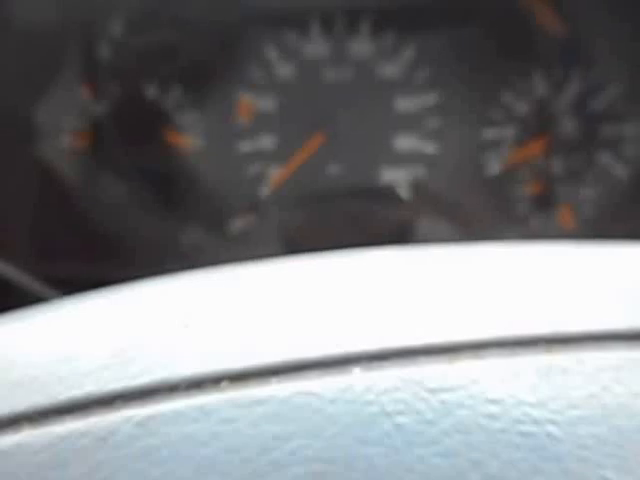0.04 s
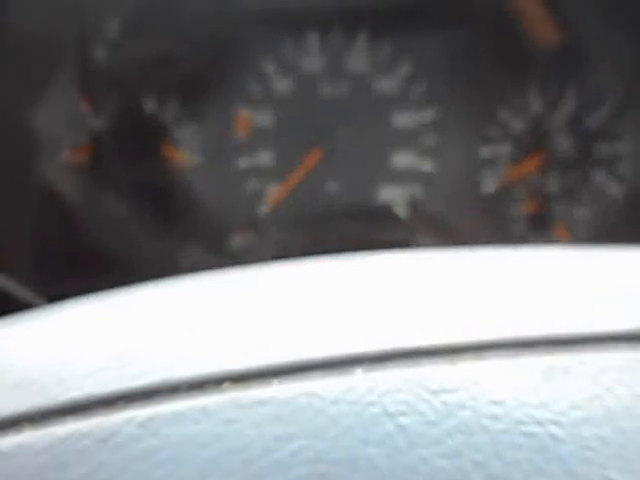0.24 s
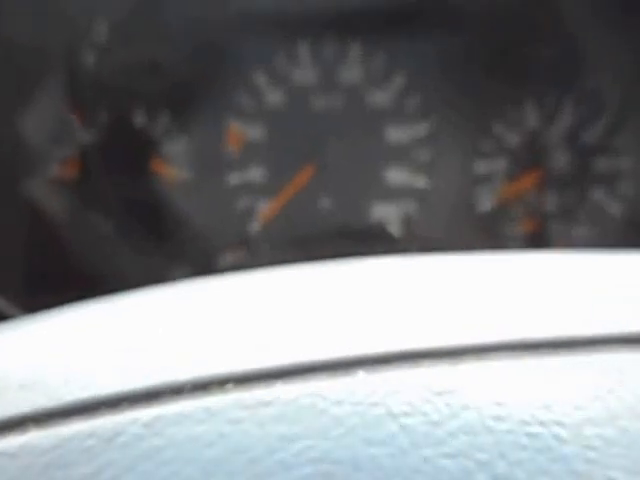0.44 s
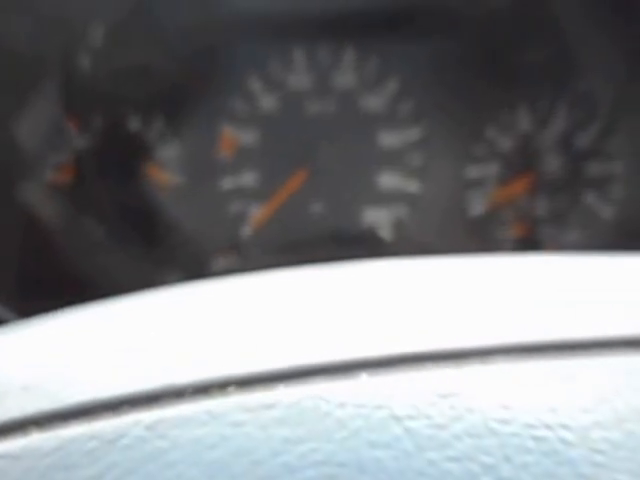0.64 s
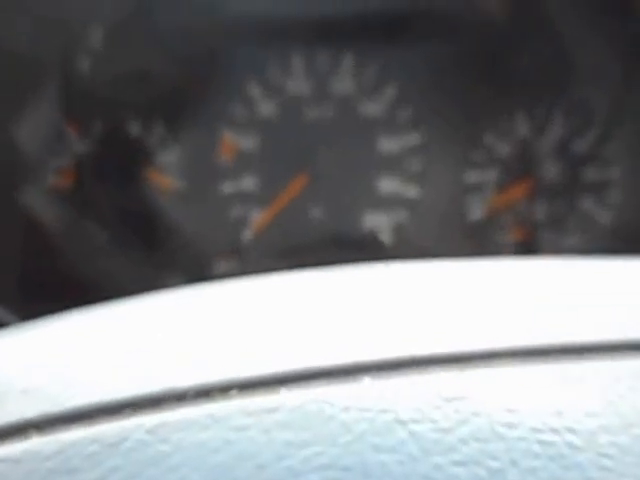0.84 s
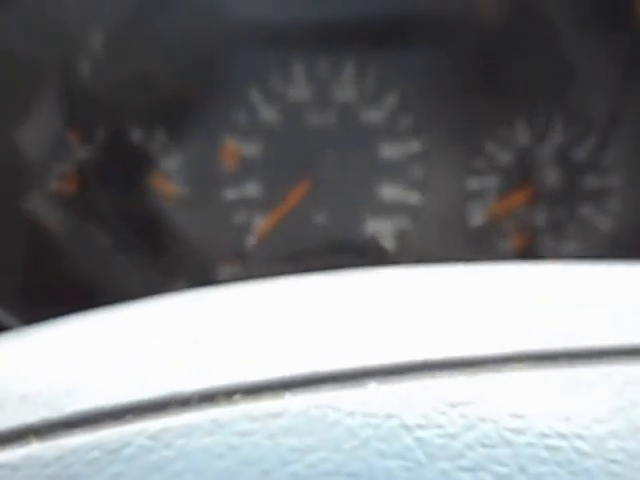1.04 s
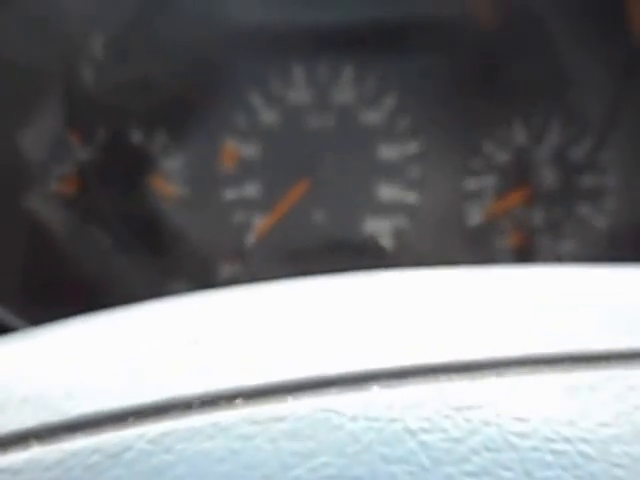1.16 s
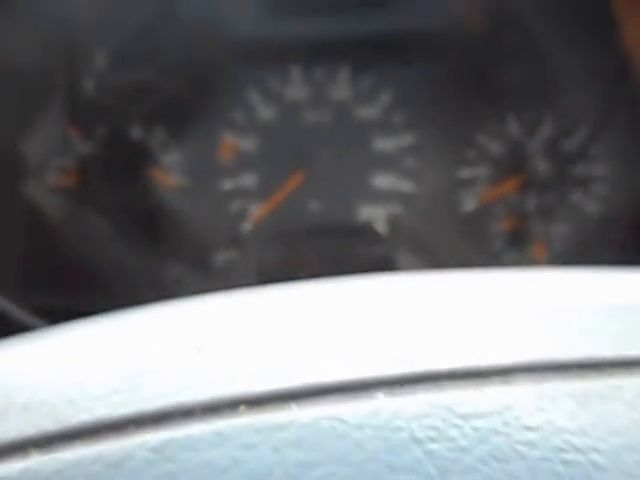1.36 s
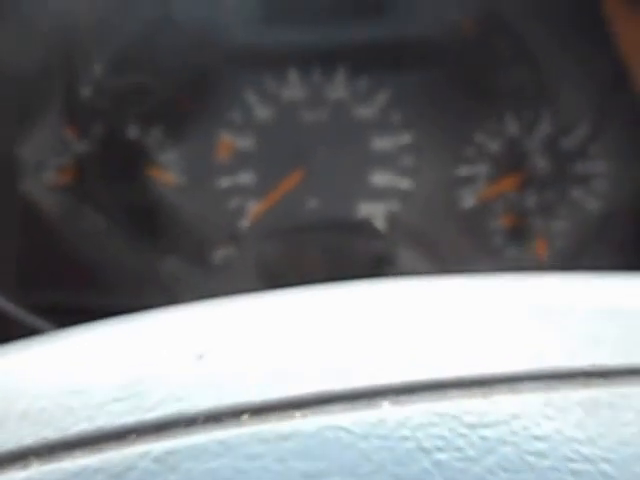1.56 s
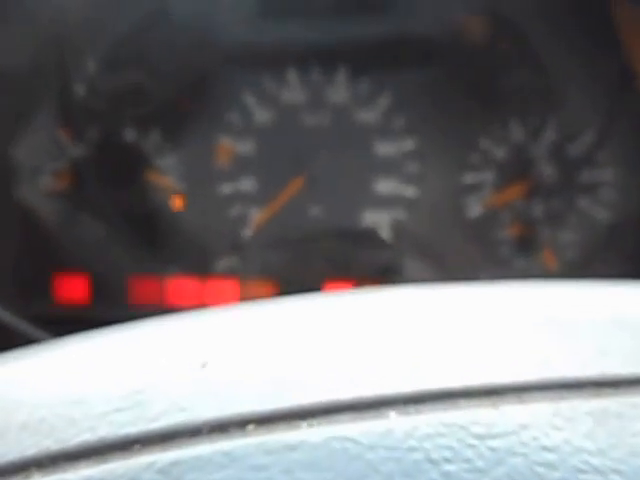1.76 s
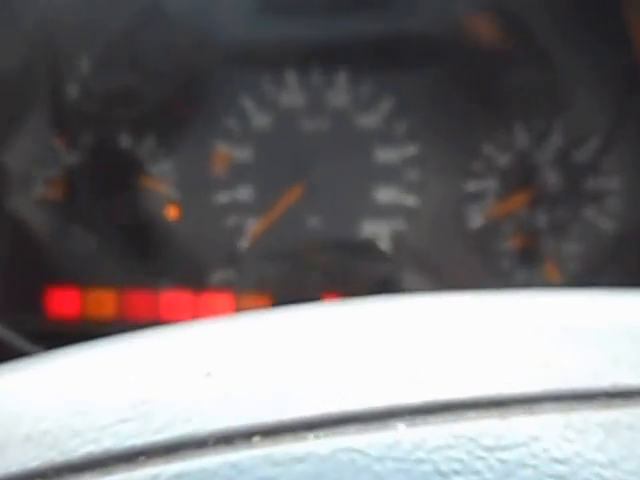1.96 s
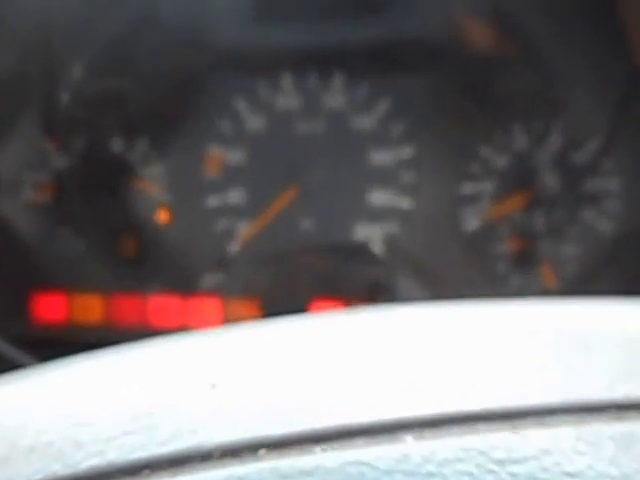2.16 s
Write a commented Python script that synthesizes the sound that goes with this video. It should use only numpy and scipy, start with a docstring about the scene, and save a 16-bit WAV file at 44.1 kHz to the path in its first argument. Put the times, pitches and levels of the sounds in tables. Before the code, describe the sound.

An ignition key turns in a parked car's lock, heard close in a dry cabin. After a tiny tick, two bright metallic snaps land at about 0.33 and 0.41 seconds with a dull column knock. Barely audible key ticks follow. At 1.65 a tight cluster makes a fuller metal-and-plastic clack, with small rattles until 1.73. Underneath, faint road hiss swells until about 1.6, with low rumble and a very thin tyre whine.

```python
"""A key turns in the ignition lock of a parked car: detents snap and ring the metal barrel (resonant modes plus
a dry crack) and the plastic column housing (modes); the column knocks and the key ticks on metal.
A short diffuse cabin tail follows. Outside a vehicle passes: banded road-noise hiss swells over steady rumble,
with a thin tyre whine made of harmonic sines."""
import sys
import numpy as np
from scipy import signal
from scipy.fft import rfft, irfft
from scipy.io import wavfile
from scipy.ndimage import uniform_filter1d

SR = 44100
rng = np.random.default_rng(int(sys.argv[2]) if len(sys.argv) > 2 else 0)


def linear_from_db(decibels):
    """Turn decibels (scalar or array-like) into linear amplitude factors; 0 gives 1."""
    return 10 ** (np.asarray(decibels, float) / 20)


def waveform_to_disk(signal):
    """Save audio, clipped to [-1, 1], as 16-bit WAV at the path in sys.argv[1]."""
    frames = np.transpose(np.atleast_2d(signal))
    scaled = np.clip(frames, -1, 1) * 32767
    samples = np.round(scaled).astype(np.int16)
    wavfile.write(sys.argv[1], SR, samples)


N = 97681

# detent snaps: t/s, metal level/dB, housing level/dB, metal colour centre f/Hz, rattle decay/ms
SNAPS = [(0.317, -33.5, -44, 5500, 8.2), (0.3257, -13, -24.5, 4860, 11.9),
         (0.4081, -13.5, -31.5, 6000, 9.4), (1.6506, -22, -29.5, 5500, 7.5),
         (1.6520, -14.5, -23, 5000, 5.3), (1.6570, -18, -15.5, 3700, 7.5), (1.672, -33.5, -31.5, 3500, 7.7)]


def rattle(when_s, decay_ms):
    """A scrape grows into a burst of tiny uneven impacts that dies away; energy is that of the envelope."""
    rise_ms, hold = 0.9, 1.14  # hold above 1: stays up before it falls
    scrape_db, scrape_ms = -13, 2.04
    grain_db = 2.7  # scales the unevenness of the impacts
    t_ms = (np.arange(N) / SR - when_s) * 1000
    after_ms = np.maximum(t_ms, 0)
    env = (1 - np.exp(-after_ms / rise_ms)) * np.exp(-(after_ms / decay_ms) ** hold)
    env = env + linear_from_db(scrape_db) * np.exp(-np.abs(t_ms) / scrape_ms)
    grain = linear_from_db(grain_db * np.minimum(rng.exponential(size=N), 3))
    burst = env * rng.standard_normal(N) * grain
    return burst * np.sqrt(np.sum(env ** 2) / np.sum(burst ** 2))


def blow(when_s, decay_ms):
    """One firm single-sample impact added to the rattle."""
    impact_db = 7  # energy re the rattle
    x = rattle(when_s, decay_ms)
    impact = (np.arange(N) == int(when_s * SR)) * np.sqrt(np.sum(x ** 2))
    return x + linear_from_db(impact_db) * impact


def colour(x, centre_hz, q):
    """One broad resonance, unity gain at its centre."""
    return signal.lfilter(*signal.iirpeak(centre_hz, q, SR), x)


def ring(x, modes):
    """Excite decaying sine modes; their summed impulse response has energy 1."""
    t = np.arange(4096) / SR
    h = sum(linear_from_db(db - 60 * t / t60_s) * np.sin(2 * np.pi * hz * t) for hz, db, t60_s in modes)
    return signal.fftconvolve(x, h / np.sqrt(np.sum(h ** 2)))[:N]


def barrel():
    """Snap rattles ring the metal barrel; the same rattles, equalised, sound as a dry crack."""
    # barrel modes: f/Hz, relative level/dB, t60/s
    barrel_modes = [(2810, -4, .03), (2955, -7, .05), (3345, -2, .035), (3810, -6, .04), (4100, -4, .03),
                    (4670, -3, .03), (5150, 0, .03), (5740, -5, .03), (6070, -3, .03), (6390, -3, .035),
                    (6700, -3, .03), (7270, -7, .03), (7410, -6, .03), (7700, -6, .03), (8050, -7, .03)]
    # crack equaliser: f/Hz, relative gain/dB
    crack_eq = [(300, -52.5), (1200, -7), (2500, 3.5), (4000, 2), (5500, 4), (7000, 4.5), (9000, 5),
                (11000, -3)]
    crack_db = 8.5
    hard = sum(linear_from_db(db) * colour(rattle(s, ms), hz, 1.135) for s, db, _, hz, ms in SNAPS)
    crack_gain = linear_from_db(crack_db + at(crack_eq, np.fft.rfftfreq(N, 1 / SR)))
    crack = irfft(rfft(hard) * crack_gain, N)
    return ring(hard, barrel_modes) + crack


def housing():
    """Snap blows ring the plastic housing."""
    # housing modes: f/Hz, relative level/dB, t60/s
    housing_modes = [(1110, -11, .04), (1330, -13, .04), (1490, -7, .04), (1568, 1, .045), (1720, -9, .04),
                     (1950, -13, .035), (2235, -1, .045), (2945, -9, .04)]
    soft = sum(linear_from_db(db) * blow(s, ms) for s, _, db, _, ms in SNAPS)
    return ring(soft, housing_modes)


def column():
    """Dull coloured blows ring the steering column."""
    # column knocks: t/s, level/dB, colour centre f/Hz, rattle decay/ms
    knocks = [(.3300, -25, 660, 3.4), (0.4096, -27, 448, 4.7), (1.6552, -26, 605, 10.6)]
    # column modes: f/Hz, relative level/dB, t60/s
    column_modes = [(320, -14, .04), (470, -4, .06), (590, -1, .05), (685, -4, .07), (770, -8, .05),
                    (980, -9, .04)]
    dull = sum(linear_from_db(db) * colour(blow(s, ms), hz, 2.3) for s, db, hz, ms in knocks)
    return ring(dull, column_modes)


def lock():
    """Barrel, housing and column sound together, low end cut."""
    low_cut_hz = 324
    high_pass = signal.butter(3, low_cut_hz, "high", fs=SR, output="sos")
    return signal.sosfilt(high_pass, barrel() + housing() + column())


def ticks():
    """Light touches of key on metal: short rattles in one broad resonance."""
    # key ticks: t/s, level/dB, colour centre f/Hz, rattle decay/ms
    touches = [(0.056, -45.5, 8800, 12), (0.284, -23.5, 3160, 3.1), (.389, -14.5, 3270, 1.3),
               (0.596, -39, 7440, 2.8), (1.285, -58, 7900, 3.6), (1.336, -42, 7800, 4.8),
               (1.609, -29, 4800, 2.7), (1.698, -24, 3620, 14), (1.728, -31, 3770, 17)]
    return sum(linear_from_db(db) * colour(rattle(s, ms), hz, 4.5) for s, db, hz, ms in touches)


def cabin(x):
    """Add a diffuse noise tail whose decay time depends on frequency, shortest near 1 kHz."""
    # cabin decay: f/Hz, t60/s
    cabin_decay = [(300, 0.16), (1000, 0.031), (2500, 0.21), (5000, 0.16), (9000, 0.21)]
    tail_db, onset_s = -18, 0.012
    t = np.arange(16384) / SR
    onset = np.minimum(t / onset_s, 1)
    h = bands(len(t), 140, lambda hz: linear_from_db(-60 * t / at(cabin_decay, hz)) * onset)
    return x + linear_from_db(tail_db) * signal.fftconvolve(x, h / np.sqrt(np.sum(h ** 2)))[:N]


def road_hiss():
    """Noise bands drift singly while the whole swells and brightens as the vehicle passes."""
    # vehicle pass: t/s, level/dB, brightness/(dB per octave)
    vehicle_pass = [(0, -43.5, -0.5), (.3, -42.5, 0), (0.599, -41.5, -0.8), (.85, -41.5, -0.36),
                    (1.101, -40, 0), (1.301, -40, 0.66), (1.549, -39, 0.02), (1.801, -39.5, -0.38),
                    (2., -41.5, 0.27), (2.21, -41.5, 0.14)]
    # road spectrum: f/Hz, relative density/(dB per Hz)
    road_spectrum = [(180, -43.5), (300, -48), (387, -5), (561, -8), (878, 1.5), (1310, -4.5), (1520, -7),
                     (1850, -3.5), (2390, -11), (3260, -12.5), (5840, -22.5), (9130, -29.5), (10600, -47.5),
                     (13800, -64), (22000, -120)]
    flicker_db, flicker_rate_hz = -0.91, 18
    pivot_hz, tread_hz, tread_gain = 900, 2000, 3.7  # the tread band follows brightness most
    t = np.arange(N) / SR
    s, db, tilt = np.array(vehicle_pass).T
    level_db, tilt = np.interp(t, s, db), np.interp(t, s, tilt)

    def band_gain(hz):
        tread = tread_gain * np.exp(-(3 * np.log2(hz / tread_hz)) ** 2)
        bright_db = tilt * (np.log2(hz / pivot_hz) + tread)
        return linear_from_db(at(road_spectrum, hz) + flicker_db * walk(flicker_rate_hz) + bright_db)

    return linear_from_db(level_db) * unit(bands(N, 236.4, band_gain))


def tyre_whine():
    """Harmonic sines on a gliding pitch, each fading up and down singly."""
    # whine: t/s, pitch f/Hz, level/dB
    whine_track = [(.55, 639.5, -70), (.72, 638.8, -50), (.95, 637, -51), (1.15, 636.7, -48),
                   (1.32, 636.5, -54), (1.46, 636.2, -44), (1.78, 635.3, -43), (1.92, 635, -58),
                   (2.2, 635, -66)]
    # whine orders: multiple of pitch, relative level/dB
    whine_orders = [(1, -12), (2, 0), (3, -6), (4, -9), (5, -11), (6, -15), (7, -16), (8, -22), (9, -21)]
    fade_db, fade_rate_hz = 2.2, 5.14
    t = np.arange(N) / SR
    s, hz, db = np.array(whine_track).T
    phase = 2 * np.pi * np.cumsum(np.interp(t, s, hz)) / SR
    whine = 0
    for k, order_db in whine_orders:
        sine = np.sin(k * phase + 2 * np.pi * rng.random())
        whine = whine + linear_from_db(order_db + fade_db * walk(fade_rate_hz)) * sine
    return linear_from_db(np.interp(t, s, db)) * whine


def rumble():
    """Steady low-frequency noise in bands below 420 Hz."""
    # rumble spectrum: f/Hz, relative density/(dB per Hz)
    rumble_spectrum = [(12, -46), (20, -26), (48, -2.5), (76, -14.5), (113, -0.5), (150, -13), (353, -2.5),
                       (400, -12.5), (520, -46), (880, -120)]
    rumble_db = -58
    noise = bands(N, 20, lambda hz: linear_from_db(at(rumble_spectrum, hz)) * (hz < 420))
    return linear_from_db(rumble_db) * unit(noise)


def unit(x):
    """Scale to rms 1."""
    return x / np.sqrt(np.mean(x ** 2))


def at(table, hz):
    """Read (f/Hz, value) points on a log-frequency axis."""
    table = np.array(table, float)
    return np.interp(np.log(np.maximum(hz, 1)), np.log(table[:, 0]), table[:, 1])


def walk(rate_hz):
    """Slow random drift, rms 1: twice-smoothed random steps at rate_hz."""
    k = int(SR / rate_hz)
    steps = np.repeat(rng.standard_normal(N // k + 1), k)
    return unit(uniform_filter1d(uniform_filter1d(steps, k), k)[:N])


def bands(n, lo_hz, gain):
    """Noise in overlapping third-octave bands, each multiplied by gain(centre Hz)."""
    f, out = np.fft.rfftfreq(n, 1 / SR), 0
    spec = rfft(rng.standard_normal(n))
    for hz in lo_hz * 2 ** (np.arange(33) / 3):
        if hz < SR / 2:
            share = np.clip(1 - 3 * np.abs(np.log2(np.maximum(f, 1) / hz)), 0, 1)
            out = out + irfft(spec * share, n) * gain(hz)
    return out


def scene():
    """Lock and ticks in the cabin over the traffic."""
    traffic = road_hiss() + tyre_whine() + rumble()
    return (cabin(lock() + ticks()) + traffic)[None]


def roll_off(x):
    """The treble ends steeply here."""
    return signal.sosfilt(signal.butter(12, 10750, fs=SR, output="sos"), x)


def record(dry):
    """Round the loudest peaks, cut the top, and start after a short silence."""
    ceiling, stop_hz, start_s = 0.66, 11710, 0.0365
    x = dry / (1 + (dry / ceiling) ** 6) ** (1 / 6)
    x = signal.sosfilt(signal.cheby2(10, 60, stop_hz, fs=SR, output="sos"), x)
    x = x * (np.arange(N) > start_s * SR)
    return roll_off(x)


dry = scene()
out = record(dry)
waveform_to_disk(out)
```